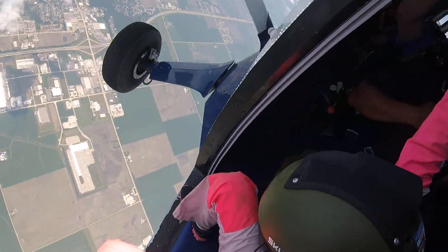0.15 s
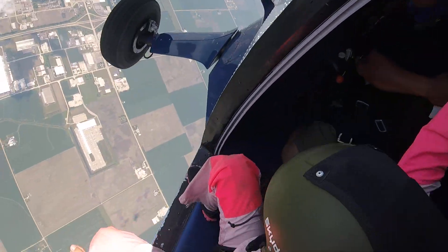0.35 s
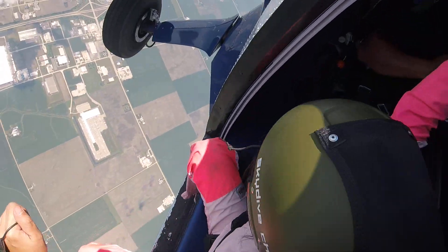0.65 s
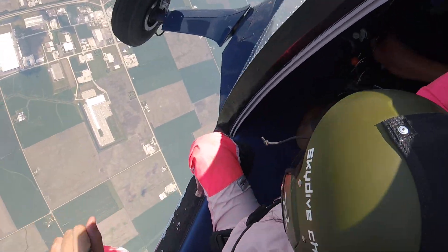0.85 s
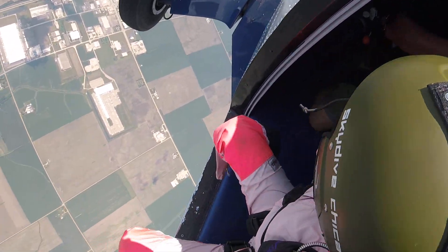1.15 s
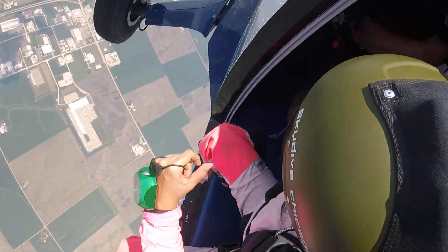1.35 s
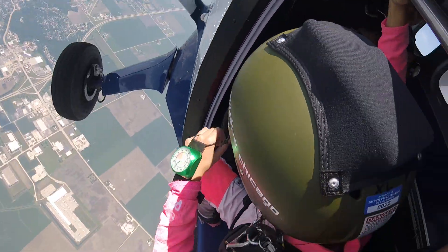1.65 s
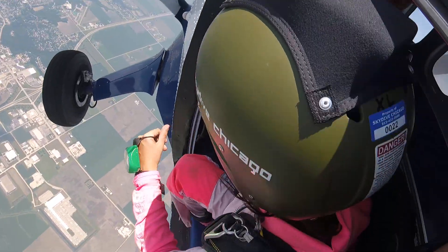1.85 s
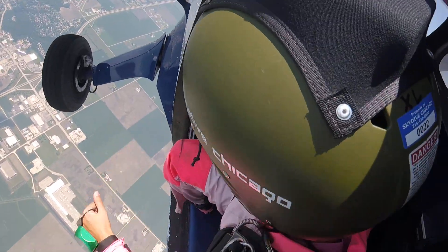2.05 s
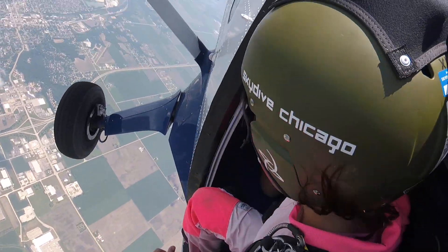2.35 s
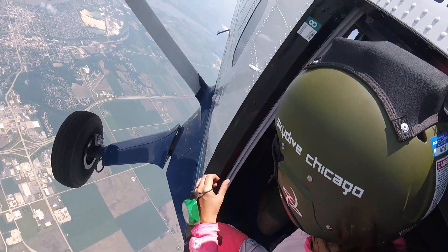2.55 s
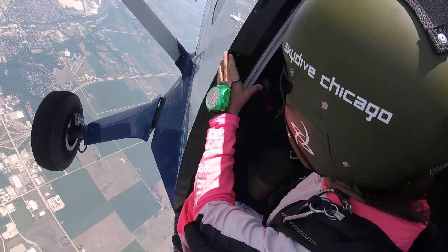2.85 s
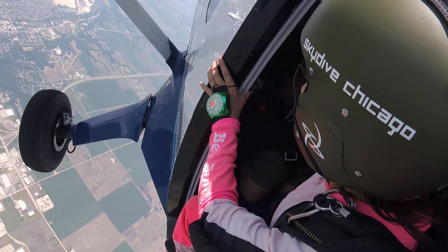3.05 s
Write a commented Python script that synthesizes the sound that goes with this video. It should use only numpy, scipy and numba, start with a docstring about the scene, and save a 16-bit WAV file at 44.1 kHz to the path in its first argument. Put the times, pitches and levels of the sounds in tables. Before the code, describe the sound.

Wind buffets a microphone at the open door of a small flying aircraft: deep rumble and growing airy rush, then heavy, thumping gusts midway, easing into low, uneven rumble with returning hiss.

```python
"""Eddies of a slipstream buffet a microphone that moves about in the open door of a small aircraft in flight.
They are noise through low-pass filters that follow a shedding rate, hardest and fastest about halfway through.
The sharpest eddies thump as damped pressure swings, and torn flow sputters as small pops in noise. Behind them
the door frame gives a broad rush, its upper middle a band of its own, and a fluttering hiss, all shaped noise
over a deep rumble. The recorder's limiter ducks under the peaks."""
import sys
import numpy as np
from scipy import signal
from scipy.fft import rfft, irfft, next_fast_len
from scipy.io import wavfile
from scipy.ndimage import uniform_filter1d, minimum_filter1d
from numba import njit

SR = 44100
rng = np.random.default_rng(int(sys.argv[2]) if len(sys.argv) > 2 else 0)


def bounce(signal):
    """Save signal as a 16-bit WAV file at the path given by the first command-line argument."""
    frames = np.transpose(np.atleast_2d(signal))
    limited = np.clip(frames, -1, 1)
    pcm = np.round(limited * 32767).astype(np.int16)
    wavfile.write(sys.argv[1], SR, pcm)


N = 140679
TIME = np.arange(N) / SR

# Upper-middle band of the rush. Each row: time in seconds, level in dB.
UPPER_RUSH_LEVEL = [(0, -44), (.4, -39), (.55, -32), (.95, -28.5), (1.3, -25), (1.45, -52), (2.6, -46),
                    (2.88, -37), (3.12, -30)]
# Spectrum of that band, around 1.6 kHz. Each row: frequency in Hz, relative density in dB per Hz.
UPPER_RUSH_SPECTRUM = [(700, -22), (1200, -8.5), (1480, -1.5), (1700, -1.5), (2000, -6.5), (3000, -30)]

# Deep rumble of the doorway. Each row: time in seconds, level in dB.
RUMBLE_LEVEL = [(0, -15), (.18, -16.5), (.23, -28.5), (.42, -19.5), (.65, -16), (.95, -16), (1.6, -13.5),
                (1.9, -14.5), (2.2, -19.5), (2.5, -11.5), (2.85, -15), (3.19, -13.5)]
# Spectrum of the rumble. Each row: frequency in Hz, relative density in dB per Hz.
RUMBLE_SPECTRUM = [(18, -28), (28, -4), (42, -5), (70, -1), (105, -1), (150, -13.5), (250, -16), (450, -29),
                   (1000, -58)]

# Rush of air past the door, before its trim. Each row: time in seconds, level in dB.
RUSH_LEVEL = [(0, -35.5), (.09, -28.5), (.15, -35), (.35, -29), (.55, -25.5), (.68, -27.5), (.79, -24),
              (.92, -26.5), (1.18, -21), (1.35, -19.5), (1.43, -30.5), (1.65, -27), (1.75, -29.5),
              (1.97, -36.5), (2.04, -30.5), (2.12, -35), (2.72, -31.5), (2.95, -26.5)]
# Spectrum of the rush. Each row: frequency in Hz, relative density in dB per Hz.
RUSH_SPECTRUM = [(120, -7), (300, 3), (520, 1.5), (800, -0.5), (1050, -.5), (1600, -3), (2200, -4),
                 (2800, -6), (4000, -14), (5500, -27), (10000, -56)]
# Hiss off the edge of the frame, before its trim. Each row: time in seconds, level in dB.
HISS_LEVEL = [(0, -47.5), (.22, -41.5), (.36, -43), (.5, -47.5), (.72, -52), (.8, -37), (.93, -30),
              (1.2, -33.5), (1.42, -37), (1.65, -36.5), (1.77, -42), (2.1, -44), (2.36, -43), (2.54, -35.5),
              (2.76, -41), (3.19, -34.5)]
# Spectrum of the hiss. Each row: frequency in Hz, relative density in dB per Hz.
HISS_SPECTRUM = [(2500, -28), (4300, -4.5), (4900, 1), (6400, -4.5), (8000, -7), (10000, -14.5),
                 (14000, -33)]
# Highest treble, before its trim. Each row: time in seconds, level in dB.
TREBLE_LEVEL = [(0, -56), (.1, -54), (.16, -50), (.48, -53), (.73, -49.5), (.92, -39), (1.12, -56),
                (1.29, -58), (1.52, -41), (1.66, -38.5), (1.78, -50.5), (2.1, -49.5), (2.36, -47),
                (2.55, -46.5), (2.72, -46.5), (3.19, -40)]
# Spectrum of the highest treble. Each row: frequency in Hz, relative density in dB per Hz.
TREBLE_SPECTRUM = [(5500, 4), (7500, -3.5), (8500, -2.5), (10200, -8), (12000, -21), (13500, -23),
                   (15000, -30)]
RUSH_TRIM_DB, HISS_TRIM_DB, TREBLE_TRIM_DB = 1, -3, 2.5
# Brief spurts in the hiss and treble; the level is relative to the steady part.
SPURTS_PER_S, SPURT_S, SPURT_DB, SPURT_SPREAD_DB = 55, 0.0024, 0, 3

# Torn flow over the microphone. Each row: time in seconds, nominal upper edge in Hz, level in dB.
SPUTTER_FLOW = [(0, 1060, -22.5), (.07, 1090, -22), (.105, 436, -22), (.2, 380, -34), (.23, 380, -55),
                (1.42, 600, -33.5), (1.56, 715, -25), (1.71, 890, -21.5), (1.82, 910, -26),
                (1.92, 694, -34), (2.0, 600, -48), (2.6, 600, -64)]
SPUTTER_LOW_HZ, SPUTTER_DAMPING = 403, 1.9
# Small pops in the torn flow, and the noise between them relative to the pops.
POPS_PER_S, POP_SPREAD_DB, SPUTTER_NOISE_DB = 220, 6.5, -1.5

# Single eddies bursting on the microphone. Each row: time in seconds, level in dB before the low-pass,
# low-pass corner (brightness) in Hz.
THUMP_BURSTS = [(.1, 0, 550), (.26, -4.5, 1400), (.281, -13, 1800), (.497, -6, 800), (.96, -3.5, 900),
                (1.574, -2.5, 1100), (1.615, -6, 1200), (1.666, -4, 1600), (1.683, 2.5, 1900),
                (1.725, 3, 1380), (1.811, -2, 1600), (1.842, -3, 1300), (1.905, -4, 1100),
                (1.953, -0.5, 550), (2.077, -8.5, 1500), (2.221, -9, 1700), (2.335, 4, 440)]
# Time constant of the suction, pitch of the swing, and time in which the swing dies by 60 dB.
THUMP_SUCTION_S, THUMP_HZ, THUMP_T60_S = 0.00066, 183, 0.01

# Eddies at the microphone. Each row: time in seconds, nominal shedding rate in Hz, level in dB.
BUFFET_EDDIES = [(0, 204, -22), (.04, 228, -15), (.12, 222, -16), (.24, 173, -28), (.7, 152, -26.5),
                 (1.42, 143, -20.5), (1.6, 218, -9.5), (1.78, 265, -6), (1.9, 265, -11.5),
                 (2.17, 246, -10.5), (2.24, 204, -15.5), (2.33, 248, -9.5), (2.4, 182, -16),
                 (2.65, 175, -14), (2.85, 137, -21), (3.19, 134, -17)]
# Corner of each low-pass as a ratio to the shedding rate, then its damping.
EDDY_HUMP_RATIO, EDDY_HUMP_DAMPING = 0.78, 0.72
EDDY_SKIRT_RATIO, EDDY_SKIRT_DAMPING = 1.42, 0.76
EDDY_EDGE_RATIO, EDDY_EDGE_DAMPING = 1.7, 1
EDDY_LOW_HZ = 127.4
SURGE_DB = -12.5  # slow pressure swings, relative to the buffeting
# Spectrum of the slow swings. Each row: frequency in Hz, relative density in dB per Hz.
SURGE_SPECTRUM = [(24, -26), (37, -12), (55, 3), (75, 0), (110, -30)]

# Limiter threshold (full scale is 1), recovery rate and smoothing window; then the recorder's upper limit.
CEILING, RELEASE_DB_PER_S, LIMITER_WINDOW_S, CUTOFF_HZ = 0.91, 65, 0.002, 14900


def from_db(db):
    """Amplitude gain is ten to the power of the level over twenty."""
    return 10 ** (np.asarray(db) / 20)


def rms_one(x):
    """Division by the root mean square gives unit power."""
    return x / np.sqrt(np.mean(x ** 2) + 1e-20)


def in_time(rows):
    """Linear interpolation gives each column of a time table at every sample."""
    seconds, *columns = np.transpose(rows)
    return [np.interp(TIME, seconds, column) for column in columns]


def cut(x, hz, kind):
    """A second-order Butterworth filter passes the lows or the highs with a flat passband."""
    return signal.sosfilt(signal.butter(2, hz, kind, fs=SR, output="sos"), x)


def noise(spectrum):
    """White noise weighted in the frequency domain takes the given spectrum, at unit power."""
    hz, db = np.transpose(spectrum)
    size = next_fast_len(N)
    log_hz = np.log(np.arange(size // 2 + 1) * SR / size + 1)
    # silent outside the table
    gain = from_db(np.interp(log_hz, np.log(hz), db, left=-200, right=-200))
    white = rng.standard_normal(size)
    return rms_one(irfft(rfft(white) * gain, size)[:N])


def drift(corner_hz):
    """A double-pole low-pass turns white noise into a smooth random fluctuation of unit power."""
    hop = 40  # samples per control step
    pole = np.exp(-2 * np.pi * corner_hz * hop / SR)
    white = rng.standard_normal(N // hop + 2002)
    slow = signal.lfilter([1], [1, -2 * pole, pole * pole], white)[2000:]  # drop the settling
    return np.interp(np.arange(N) / hop, np.arange(len(slow)), rms_one(slow))


def steadied(x, span_s):
    """Division by the local root mean square evens out swells longer than the span, keeping fast lumps."""
    size = int(span_s * SR)
    power = uniform_filter1d(uniform_filter1d(x * x, size), size)
    return x / np.sqrt(power + 1e-12)


def kicks(per_s, spread_db):
    """Random impulses: independent chance at each sample, with sizes spread normally in dB."""
    struck = rng.random(N) < per_s / SR
    return struck * from_db(spread_db * np.clip(rng.standard_normal(N), -2, 2))


@njit
def moving_lowpass(x, step, damping):
    """A state-variable resonator acts as a two-pole low-pass; step is its angle per sample in radians."""
    out, low, band = np.zeros(len(x)), 0., 0.
    for i in range(len(x)):
        low += step[i] * band
        band += step[i] * (x[i] - low - damping * band)
        out[i] = low
    return out


def rumble():
    """Low-frequency pressure fluctuation: deep, lumpy noise in the doorway."""
    level_db, = in_time(RUMBLE_LEVEL)
    return from_db(level_db) * steadied(noise(RUMBLE_SPECTRUM), span_s=0.044)


def upper_rush():
    """Band-shaped noise: the upper middle of the rush follows a level curve of its own."""
    level_db, = in_time(UPPER_RUSH_LEVEL)
    return from_db(level_db) * noise(UPPER_RUSH_SPECTRUM)


def slipstream():
    """Amplitude modulation: rush, hiss and treble share some flutter; the upper two also come in spurts."""
    flutter, grain = drift(16.5), drift(195)
    puff = np.hanning(int(SPURT_S * SR))
    puffs = signal.fftconvolve(kicks(SPURTS_PER_S, SPURT_SPREAD_DB), puff, "same")
    spurts = 1 + from_db(SPURT_DB) * puffs

    def layer(level, source, flutter_db, grain_db, own_db):
        """Common and independent fluctuations add in dB before the level curve."""
        wobble = from_db(flutter_db * flutter + grain_db * grain + own_db * drift(30))
        level_db, = in_time(level)
        return from_db(level_db) * rms_one(source * wobble)

    # a negative depth moves against the shared fluctuation
    rush = layer(RUSH_LEVEL, noise(RUSH_SPECTRUM), flutter_db=-0.2, grain_db=1.43, own_db=0.68)
    hiss = layer(HISS_LEVEL, noise(HISS_SPECTRUM) * spurts, flutter_db=-0.3, grain_db=0.1, own_db=1.75)
    treble = layer(TREBLE_LEVEL, noise(TREBLE_SPECTRUM) * spurts, flutter_db=-0.4, grain_db=0.9, own_db=-0.2)
    return from_db(RUSH_TRIM_DB) * rush + from_db(HISS_TRIM_DB) * hiss + from_db(TREBLE_TRIM_DB) * treble


def sputter():
    """Intermittent turbulence: torn flow is a dense run of small pops in noise, with a moving upper edge."""
    edge_hz, level_db = in_time(SPUTTER_FLOW)
    step = 2 * np.pi * edge_hz / SR
    pops = rms_one(kicks(POPS_PER_S, POP_SPREAD_DB))
    torn = pops + from_db(SPUTTER_NOISE_DB) * rng.standard_normal(N)
    torn = cut(torn, SPUTTER_LOW_HZ, "high")
    torn = moving_lowpass(torn, step * 0.79, np.sqrt(2))
    torn = moving_lowpass(torn, step * 1.25, SPUTTER_DAMPING)
    return from_db(level_db) * steadied(torn, span_s=0.056)


def thumps():
    """Transient pressure: suction grows exponentially, snaps back and swings out as a damped sine."""
    t = np.arange(-SR // 50, SR // 20) / SR
    after = np.maximum(t, 0)
    suction = -np.exp(np.minimum(t, 0) / THUMP_SUCTION_S)
    swing = np.sin(2 * np.pi * THUMP_HZ * after) * from_db(-60 * after / THUMP_T60_S)
    pulse = np.where(t < 0, suction, swing)
    total = np.zeros(N)
    for start, level_db, bright_hz in THUMP_BURSTS:
        softened = cut(pulse, bright_hz, "low")
        total += from_db(level_db) * np.interp(TIME - start, t, softened, left=0, right=0)
    return total


def buffet():
    """Vortex shedding: noise humps near the shedding rate, falls steeply above it and surges slowly below."""
    shedding_hz, level_db = in_time(BUFFET_EDDIES)
    step = 2 * np.pi * shedding_hz / SR
    swirl = rng.standard_normal(N)
    swirl = moving_lowpass(swirl, step * EDDY_HUMP_RATIO, EDDY_HUMP_DAMPING)
    swirl = moving_lowpass(swirl, step * EDDY_SKIRT_RATIO, EDDY_SKIRT_DAMPING)
    swirl = moving_lowpass(swirl, step * EDDY_EDGE_RATIO, EDDY_EDGE_DAMPING)
    eddies = steadied(cut(swirl, EDDY_LOW_HZ, "high"), span_s=0.038)
    surge = from_db(SURGE_DB) * steadied(noise(SURGE_SPECTRUM), span_s=0.055)
    return from_db(level_db) * (eddies + surge)


def scene():
    """Superposition: the pressures of all the air add at one microphone."""
    return (rumble() + upper_rush() + slipstream() + sputter() + thumps() + buffet())[None]


def record(dry):
    """Peak limiting: gain ducks fast under the peaks and recovers slowly; a steep low-pass cuts the top."""
    over_db = 20 * np.log10(np.maximum(np.abs(dry[0]) / CEILING, 1))
    fall_db = RELEASE_DB_PER_S * TIME
    held_db = np.maximum.accumulate(over_db + fall_db) - fall_db
    size = int(LIMITER_WINDOW_S * SR)
    # the centred window begins each duck just ahead of its peak
    gain_db = uniform_filter1d(minimum_filter1d(-held_db, size), size)
    top_cut = signal.ellip(10, 0.1, 80, CUTOFF_HZ, fs=SR, output="sos")
    return signal.sosfilt(top_cut, dry * from_db(gain_db))


dry = scene()
out = record(dry)
bounce(out)
```